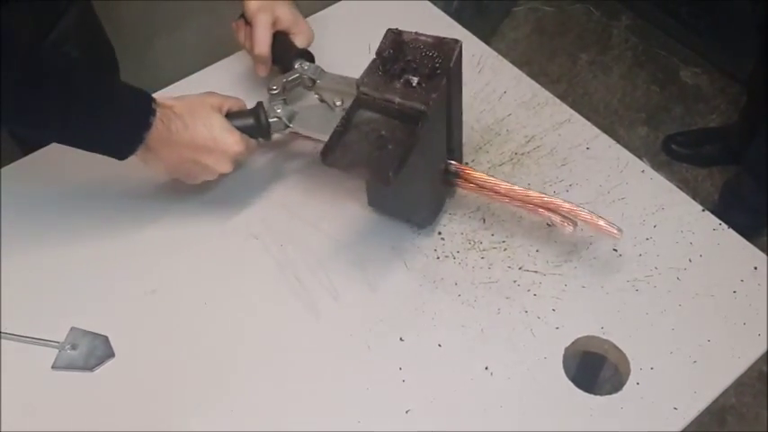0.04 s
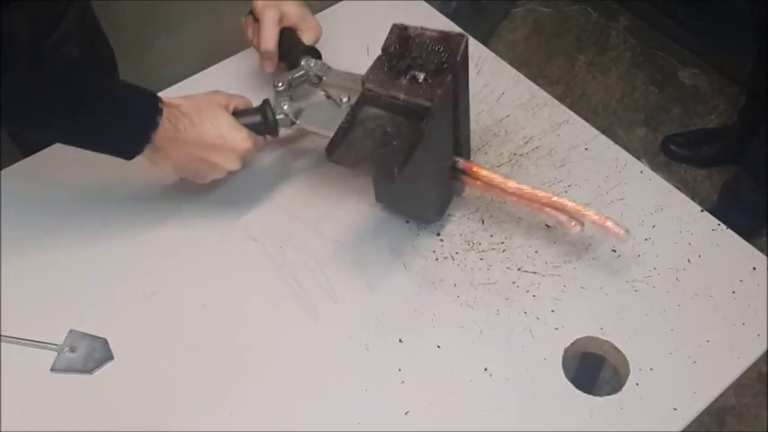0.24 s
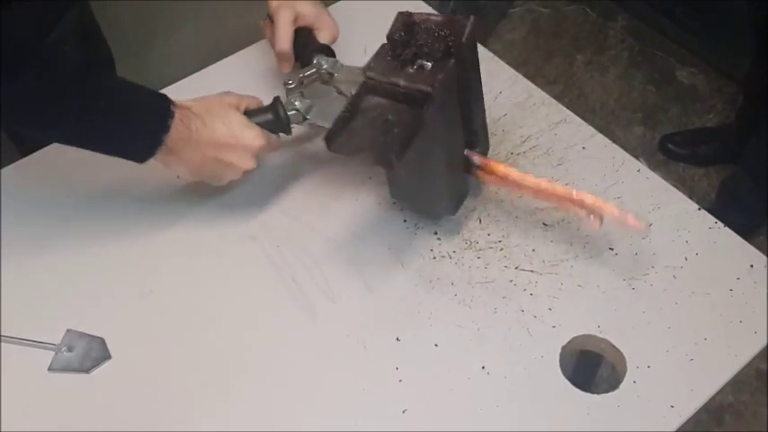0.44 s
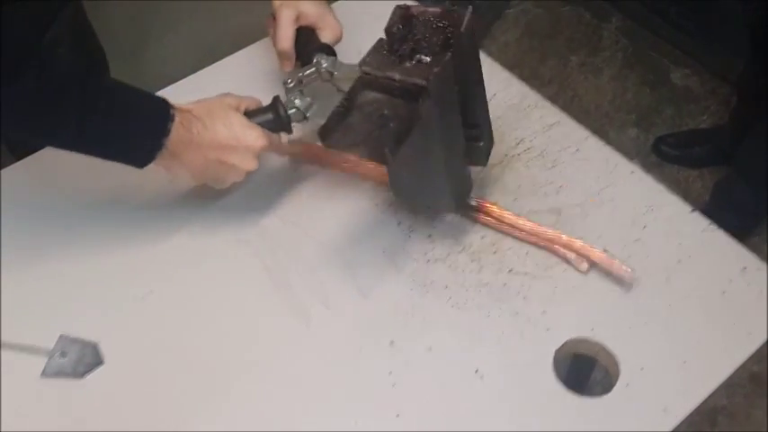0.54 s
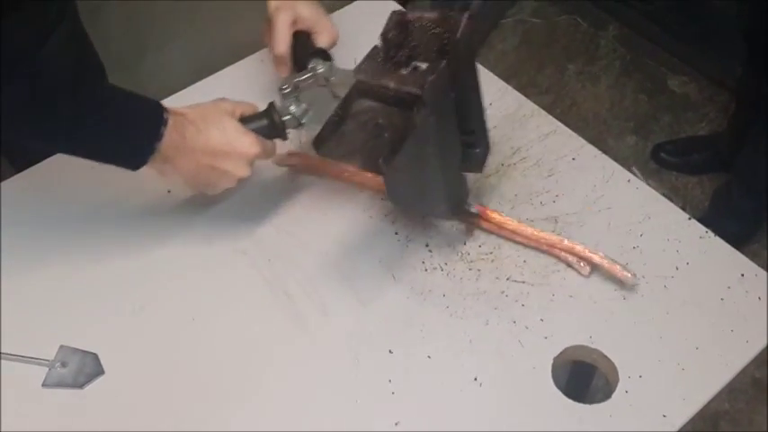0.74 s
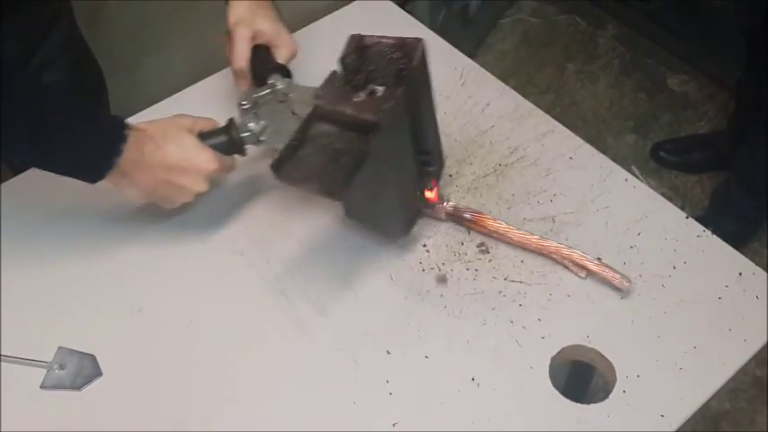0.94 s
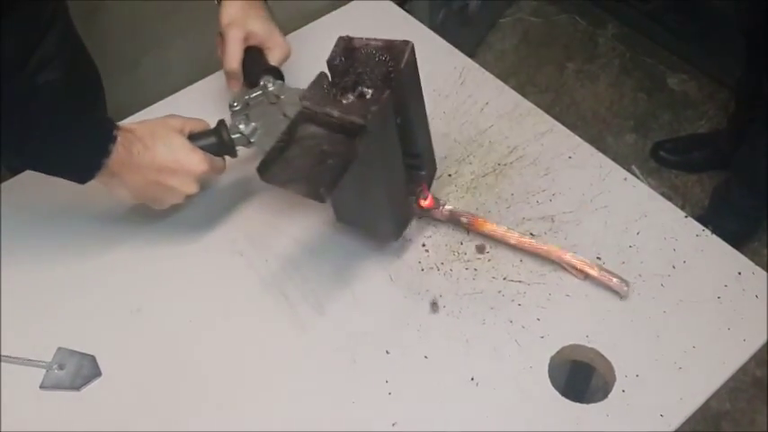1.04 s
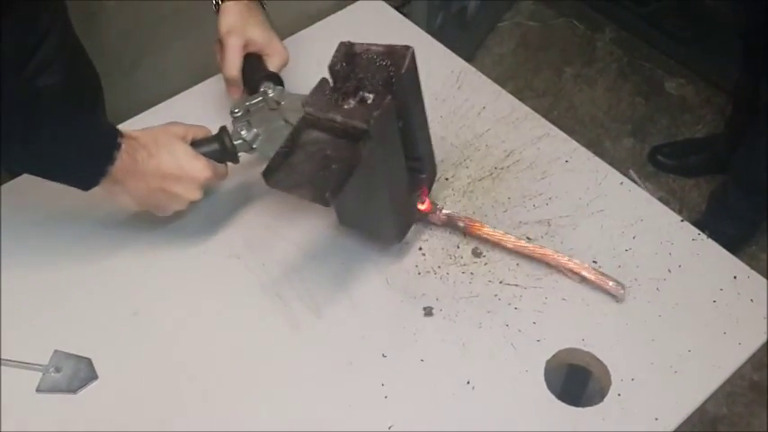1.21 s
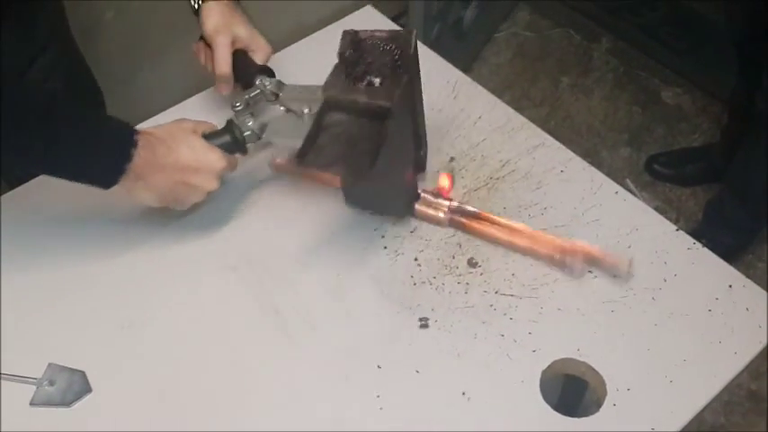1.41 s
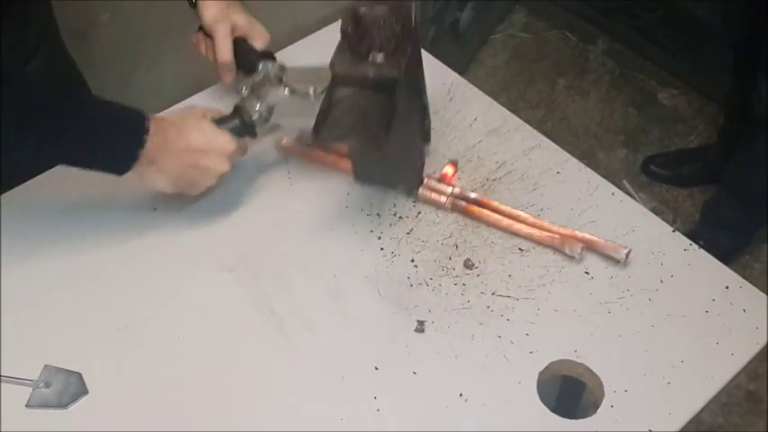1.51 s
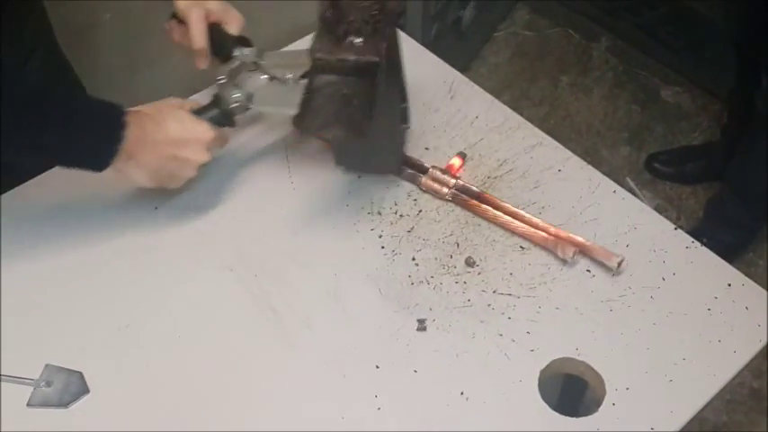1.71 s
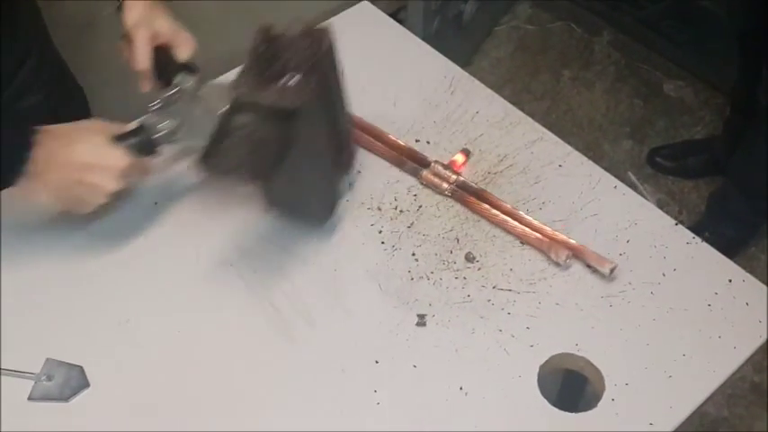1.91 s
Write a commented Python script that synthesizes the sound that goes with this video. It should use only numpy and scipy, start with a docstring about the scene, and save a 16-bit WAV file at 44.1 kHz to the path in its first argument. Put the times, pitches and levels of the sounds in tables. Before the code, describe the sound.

Two booming knocks of a heavy mold on a tabletop, with clinks and crumbs ticking.

```python
"""A soft rubbing, a tick and a clink come first, as a heavy mold is moved by its clamp handles.
It is knocked twice on a table in a reverberant workshop: each impact excites the modes of the
table top, which booms, and the first sets two copper rods ringing. The clamp clinks, the rods tap
the mold, and stick-slip friction makes a gritty scrape as it opens and slides off them.
Brittle crumbs of slag tick on the table."""
import sys
import numpy as np
from scipy import signal
from scipy.fft import rfft, irfft
from scipy.io import wavfile
from scipy.ndimage import uniform_filter1d

SR = 44100
rng = np.random.default_rng(int(sys.argv[2]) if len(sys.argv) > 2 else 0)


def dump_mix(stems):
    """Bounce the given channels to the path in sys.argv[1] as a 16-bit WAV at rate SR."""
    frames = np.atleast_2d(stems).T  # one column per channel
    limited = np.clip(frames, -1, 1)  # hard clip at full scale
    pcm = np.round(limited * 32767).astype(np.int16)
    wavfile.write(sys.argv[1], SR, pcm)


N = 85995

# coherence of the sound field between left and right: f/Hz, coherence
COHERENCE = [(60, 0.8), (175, 0.99), (280, 0.92), (550, 0.84), (1000, 0.0099), (15000, 0)]


def amp(db):
    """Decibels to amplitude ratio."""
    return 10 ** (np.asarray(db) / 20)


def unit(x):
    """Normalisation to a mean energy of one per channel."""
    return x / np.sqrt(np.mean(np.sum(x ** 2, -1)) + 1e-20)


def value_at(curve, hz):
    """Interpolation on a logarithmic frequency axis."""
    f, value = np.transpose(curve)
    return np.interp(np.log(hz + 1), np.log(f + 1), value)


def add(mix, start_s, sound):
    """Superposition of a sound on the mix."""
    part = mix[:, max(round(start_s * SR), 0):][:, :sound.shape[-1]]
    part += sound[..., :part.shape[1]]


def pan(side_db):
    """Constant-power panning by a left-right level difference."""
    return unit(amp(np.clip(side_db, -10, 10) * np.array([[.5], [-.5]])))


def colour(x, spectrum, tilt_db=0):
    """Minimum-phase filtering to a spectrum, tilted per octave from 150 to 2000 Hz."""
    size = 4096
    hz = abs(np.fft.fftfreq(size, 1 / SR))
    log_gain = np.log(amp(value_at(spectrum, hz) + tilt_db * np.log2(np.clip(hz, 150, 2000))))
    response = np.fft.ifft(np.exp(np.conj(signal.hilbert(log_gain)))).real[:size // 2]
    return signal.fftconvolve(x, response[None], axes=1)[:, :x.shape[1]]


def flatten(x):
    """Spectral whitening: narrow peaks and dips are levelled, so a diffuse sound has no pitch."""
    z = np.fft.fft(x)
    power = np.mean(abs(z) ** 2, 0) + 1e-12
    fine, broad = [uniform_filter1d(power, round(hz * x.shape[1] / SR), mode="wrap") for hz in (24, 400)]
    log_gain = .5 * np.log(broad / fine)
    return np.fft.ifft(z * np.exp(np.conj(signal.hilbert(log_gain)))).real


def diffuse(noises):
    """Spatial coherence: long waves reach two nearby points alike, short waves independently."""
    left, other = rfft(noises)
    coherence = np.clip(value_at(COHERENCE, np.fft.rfftfreq(noises.shape[1], 1 / SR)), -1, 1)
    right = coherence * left + np.sqrt(1 - coherence ** 2) * other
    return irfft(np.array([left, right]), noises.shape[1])


def impact(t60, spectrum, tilt_db=0):
    """Modal overlap: dense, heavily damped modes merge into a noise burst, here of unit energy."""
    t = np.arange(SR // 4) / SR
    decay = amp(-60 * t / t60)
    z = rfft(rng.standard_normal((2, len(t))) * decay)
    z /= np.sqrt(uniform_filter1d(abs(z) ** 2, size=40, axis=1) + 1e-12)
    burst = diffuse(irfft(z, len(t))) * np.sqrt(decay)  # shortens the decay to about 2/3 of t60
    return unit(colour(flatten(burst), spectrum, tilt_db))


def ring(modes, tilt_db=0, rise_cycles=0.0091):
    """Free vibration: damped sines, the higher ones out of phase between left and right."""
    t, out = np.arange(SR) / SR, 0
    for hz, db, t60 in modes:
        phase_gap = rng.choice([-1, 1]) * np.arccos(np.clip(value_at(COHERENCE, hz), -1, 1))
        decay = amp(db + tilt_db * np.log2(hz / modes[0][0]) - 60 * t / t60)
        rise = 1 - np.exp(-t * hz / rise_cycles)
        out = out + decay * rise * np.sin(2 * np.pi * hz * t + phase_gap * np.array([[.5], [-.5]]))
    return out


def friction(envelope, spectrum, spread_db, slips_per_s=6000):
    """Stick-slip friction: many small slips of uneven size merge into noise."""
    t = np.arange(N) / SR
    sizes = amp(spread_db * np.minimum(rng.exponential(1, N), 4))
    slips = sizes * (rng.random(N) < slips_per_s / SR)
    grains = colour(diffuse(slips * rng.standard_normal((2, N))), spectrum)
    return np.sqrt(N) * unit(grains) * amp(np.interp(t, *np.transpose(envelope)))


def room(x, wet_db, delay_s=0.0012):
    """Reverberation: a diffuse tail follows the direct sound, each band decaying at its own rate."""
    # reverberation time of the workshop: f/Hz, T60/s
    decay_times = [(100, 0.72), (300, 0.61), (800, 0.46), (2000, 0.61), (5000, 0.41), (9000, 0.29),
                   (15000, 0.1)]
    hz, t, z = signal.stft(diffuse(rng.standard_normal((2, SR))), SR, nperseg=256)
    decay = amp(-60 * t / value_at(decay_times, hz)[:, None])
    tail = signal.istft(z * decay, SR, nperseg=256)[1]
    tail *= np.clip(np.arange(tail.shape[1]) / SR / delay_s - 1, 0, 1)
    response = flatten(signal.unit_impulse(tail.shape[1]) + amp(wet_db) * unit(tail))
    return signal.fftconvolve(x, response, axes=1)[:, :N]


def still_air():
    """Ambient noise: the air of the workshop carries a faint, steady diffuse field."""
    # background spectrum: f/Hz, level/dB
    spectrum = [(20, 5), (60, -16), (250, 9), (800, 2.5), (2000, -25.5), (15000, -42)]
    noise = colour(diffuse(rng.standard_normal((2, N))), spectrum)
    return amp(-57.5) * np.sqrt(N) * unit(noise)


def handling():
    """Sliding friction: the mold rubs softly as it is moved."""
    # envelope of the rubbing: t/s, level/dB
    envelope = [(0, -39.5), (.15, -38.5), (.2, -44.5), (.6, -46.5), (.88, -58.5), (1.0, -51.5), (1.3, -57),
                (1.5, -46), (1.95, -47.5)]
    # its spectrum: f/Hz, level/dB
    spectrum = [(50, -6.5), (100, -12), (150, 0.5), (230, 3.5), (400, -5.5), (900, -7), (2000, -11.5),
                (4500, -18), (8500, -18), (14000, -26.5)]
    return friction(envelope, spectrum, spread_db=1.5)


def slag_ticks():
    """Brief contacts radiate treble: brittle crumbs snap off and land to either side."""
    # crumbs, each column on its own relative scale: t/s, level/dB, body/dB, snap/dB
    crumbs = [(0.1202, -22.5, -20, -23), (0.3875, -16.5, -2, -31), (0.4743, -30, -34, -23),
              (0.5053, -30, 6.5, -17), (0.5623, -28.5, -3, -24), (0.57, -32, -8, -22),
              (0.644, -32.5, -6, -24), (0.6902, -34.5, -11.5, -24), (0.7293, -31, -3, -31),
              (0.8134, -37, -38.5, -4.5), (1.129, -15.5, -17, -25), (1.2012, -19.5, -34, -16),
              (1.266, -20.5, -25, -16), (1.2939, -12.5, -6.5, -11.5), (1.4748, -30, -23, -12),
              (1.479, -21, -8.5, -12), (1.4855, -25.5, -6, -11), (1.5375, -30, -10, -8),
              (1.5995, -17.5, -18, -12.5), (1.640, -25, -7, -20), (1.701, -26.5, -8, -2.5),
              (1.8001, -28, -26, -17), (1.836, -33.5, -30, -14)]
    # spectrum of the tick: f/Hz, level/dB
    tick_spectrum = [(100, -47), (1000, -11), (4000, -46), (6500, -0.5), (8700, 1.5), (11000, -6.5),
                     (15000, -17)]
    # of its duller body: f/Hz, level/dB
    body_spectrum = [(200, -40), (1000, -34), (3500, -22.5), (6000, -19.5), (12000, -73)]
    # of its thin, bright snap: f/Hz, level/dB
    snap_spectrum = [(4000, -49), (10000, -14.5), (12500, -9), (16000, -6.5)]
    out = np.zeros((2, N))
    for s, db, body_db, snap_db in crumbs:
        tick = impact(0.018, tick_spectrum)
        body = amp(body_db - 3) * impact(0.018, body_spectrum)
        snap = amp(snap_db + 11) * impact(0.0086, snap_spectrum)
        add(out, s, amp(db + 11.5) * pan(6.5 * rng.standard_normal()) * (tick + body + snap))
    return out


def clamp_clinks():
    """Inharmonic modes: the struck clamp rings briefly at non-integer multiples of its pitch."""
    # clinks: t/s, level/dB, f/Hz of the lowest mode
    clinks = [(.1475, -29.5, 2020), (.48, -44, 2030), (.573, -41, 2180), (.9145, -52, 3940),
              (1.049, -36, 1970), (1.0665, -34, 3050)]
    # modes of the clamp: frequency ratio, level/dB, T60/s
    modes = [(1, 0, .11), (1.045, -4, .09), (1.76, -12, .05), (3.05, -7, .04)]
    out = np.zeros((2, N))
    for s, db, hz in clinks:
        add(out, s, amp(db) * ring([(hz * ratio, level, t60) for ratio, level, t60 in modes]))
    return out


def table_knocks():
    """Impulsive excitation: each blow gives a thud and a crack and sets the table top booming."""
    # blows: t/s, thud/dB, tilt of thud and boom/(dB per octave), crack/dB, boom/dB
    blows = [(0.2027, 17.5, -0.5, 1, 22.5), (.2475, 10.5, -1, -4.5, 8), (.322, 1.5, -2, -12.5, -2),
             (0.977, -8.5, -7.5, -38, -3), (1.056, -7.5, -6, -35, 0.5), (1.0854, 11, 2.5, 1.5, 17.5),
             (1.113, 6, 0, -24, 4.5), (1.187, 1, -5.5, -17, 15.5), (1.294, -7, -3.5, -11, -21),
             (1.455, -20.5, -3.5, -44, 6)]
    # spectrum of the thud: f/Hz, level/dB
    thud_spectrum = [(40, -51), (100, -25), (150, -15), (210, -3), (270, 0), (315, -3), (382, 7), (455, -4),
                     (560, -2), (710, -0.5), (805, 8.5), (900, -1.5), (1150, -5), (1500, -15), (2300, -22),
                     (5000, -43.5)]
    # of the crack: f/Hz, level/dB
    crack_spectrum = [(200, -32), (1200, -16.5), (2300, 3.5), (3500, 2), (6000, 1), (8500, 1.5),
                      (11000, -4.5), (15000, -13)]
    # modes of the table top under the mold: f/Hz, level/dB, T60/s
    modes = [(134.5, -16, .7), (178, 2, .74), (223, -8, .55), (276, -6, .62), (379, 1.5, .33),
             (395, 0, .33), (537, -2.5, .58), (601, -8, .45), (658, -1, .48), (765, -1.5, .45),
             (809, 5.5, .3), (854, -4, .38), (1044, -11, .48), (1091, -12, .4), (1263, -11, .42)]
    contacts, boom = np.zeros((2, 2, N))
    for s, thud_db, tilt_db, crack_db, boom_db in blows:
        thud = amp(thud_db) * impact(.085, thud_spectrum, tilt_db)
        crack = amp(crack_db) * impact(.028, crack_spectrum)
        add(contacts, s, thud + crack)
        add(boom, s, amp(boom_db) * unit(ring(modes, tilt_db, rise_cycles=0.83)))
    damp_start_s, damp_length_s, damp_db = 1.162, 0.081, -17  # the shifting mold damps the table top
    damping = amp(damp_db * np.clip((np.arange(N) / SR - damp_start_s) / damp_length_s, 0, 1))
    return room(contacts, wet_db=1.5) + boom * damping


def rod_ring():
    """Beating: two struck copper rods ring slightly out of tune, each mode from its own direction."""
    # blows on the rods: t/s, level/dB
    blows = [(0.232, -24)]
    # modes of a rod: f/Hz, level/dB, T60/s, left minus right/dB
    modes = [(4651, 0, .24, 8), (5459, -5, .24, 0), (6428, -7, .26, 0), (7957, -2, .2, -9)]
    rise_s, beat_hz, twin_db = .014, 23, -8
    out = np.zeros((2, N))
    for s, db in blows:
        for hz, mode_db, t60, side_db in modes:
            twins = [(hz, mode_db, t60), (hz + beat_hz, mode_db + twin_db, t60)]
            add(out, s, amp(db) * pan(side_db) * ring(twins, rise_cycles=rise_s * hz))
    return out


def sharp_taps():
    """Damped impacts: short, unpitched clicks. The rods tap the mold, and the loudest click is the sharp crack
    of the second knock on the table."""
    # taps: t/s, level/dB
    taps = [(0.9136, -24.5), (1.049, -17), (1.0878, 3), (1.6, -8.5)]
    # spectrum of a tap: f/Hz, level/dB
    spectrum = [(100, -48), (1500, -10), (2300, -7.5), (3400, -2), (3950, -8.5), (5000, -3.5), (7000, -1.5),
                (10000, -13), (15000, -47)]
    out = np.zeros((2, N))
    for s, db in taps:
        add(out, s, amp(db) * impact(.04, spectrum))
    return out


def mold_scrape():
    """Rough friction: the mold grinds along the rods, each band leaning to its own side."""
    # envelope of the scrape: t/s, level/dB
    envelope = [(1.04, -61.5), (1.075, -27), (1.15, -27), (1.2, -32), (1.25, -45.5), (1.38, -58.5)]
    # spectrum of the grit: f/Hz, level/dB
    spectrum = [(200, -2.5), (700, 9.5), (1400, 8.5), (2500, -1), (5500, -2), (8700, 3), (10500, -5.5),
                (14500, -5)]
    # its balance: f/Hz, left minus right/dB
    balance = [(3300, 0.5), (5500, 12), (9000, -7.5), (13000, 3)]
    lean_db = value_at(balance, np.fft.rfftfreq(N, 1 / SR)) * np.array([[.5], [-.5]])
    grit = friction(envelope, spectrum, spread_db=3)
    return irfft(rfft(grit) * amp(lean_db), N)


def scene():
    """Superposition of all sources; the clamp is close, so its direct sound dominates."""
    debris = room(slag_ticks() + mold_scrape(), wet_db=-3.5)
    knocks = table_knocks() + rod_ring()
    clinks, taps = clamp_clinks(), sharp_taps()
    metal = room(clinks, wet_db=-15) + room(taps, wet_db=-3.5)
    return knocks + metal + debris + handling() + still_air()


def record(dry):
    """Soft saturation rounds the peaks; band limiting thins the deep bass and the top."""
    # microphone response: f/Hz, level/dB
    response = [(40, -13), (120, 0.5), (14400, -1.5), (14900, -15), (16500, -30)]
    rounded = dry / (1 + dry ** 8) ** (1 / 8)
    lowpass = signal.firwin(511, cutoff=16500, window=("kaiser", 9), fs=SR)
    return signal.oaconvolve(colour(rounded, response), lowpass[None], "same")


dry = scene()
out = record(dry)
dump_mix(out)
```